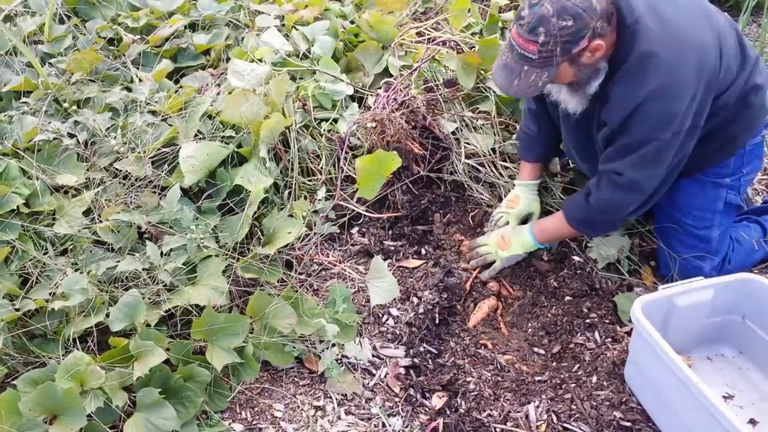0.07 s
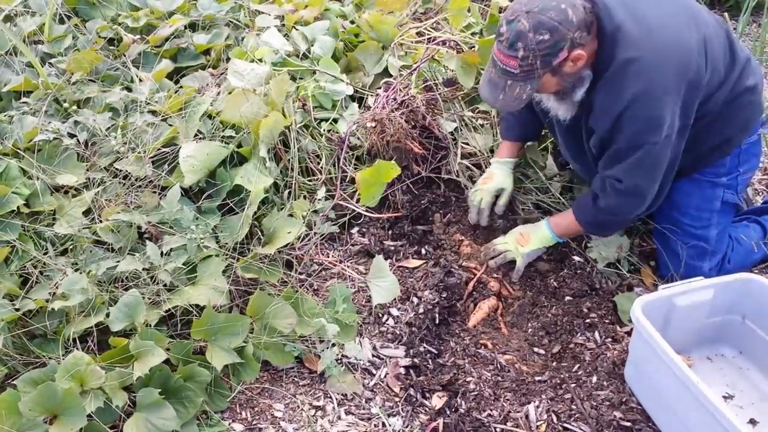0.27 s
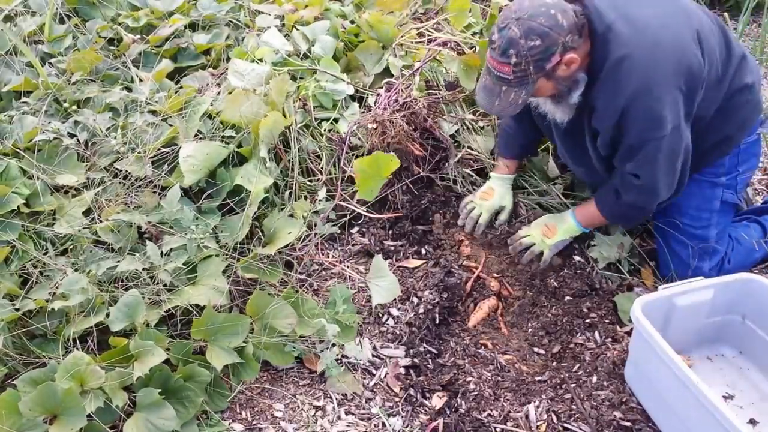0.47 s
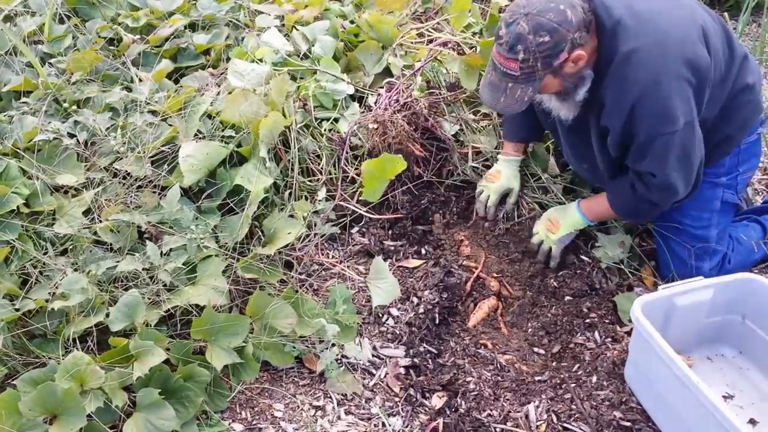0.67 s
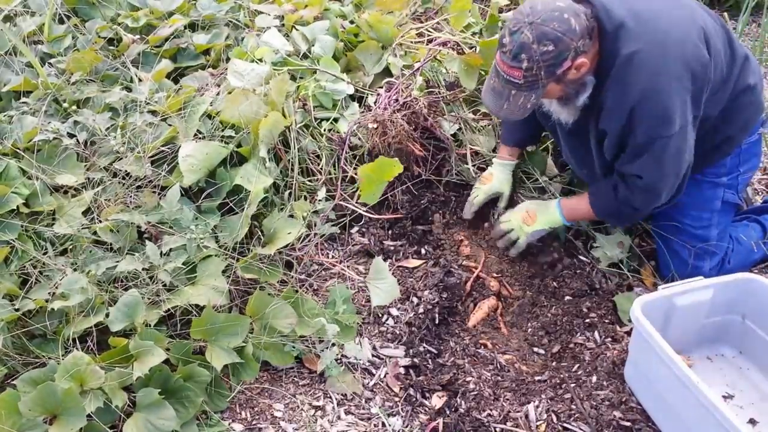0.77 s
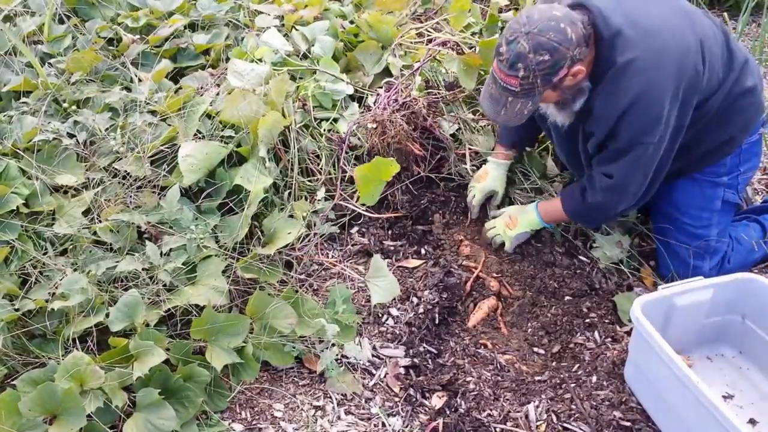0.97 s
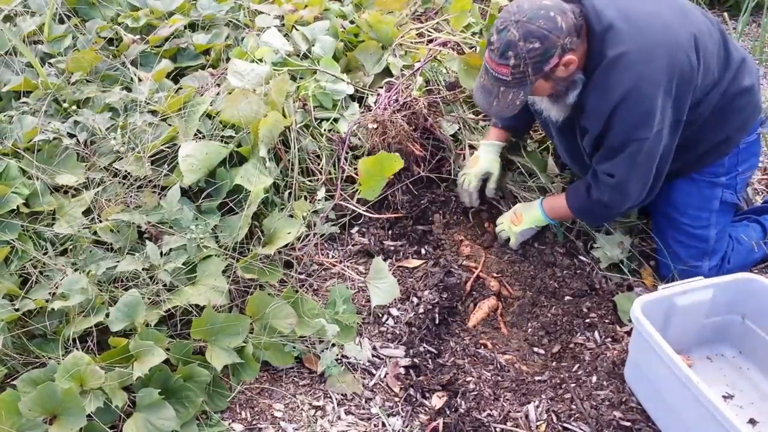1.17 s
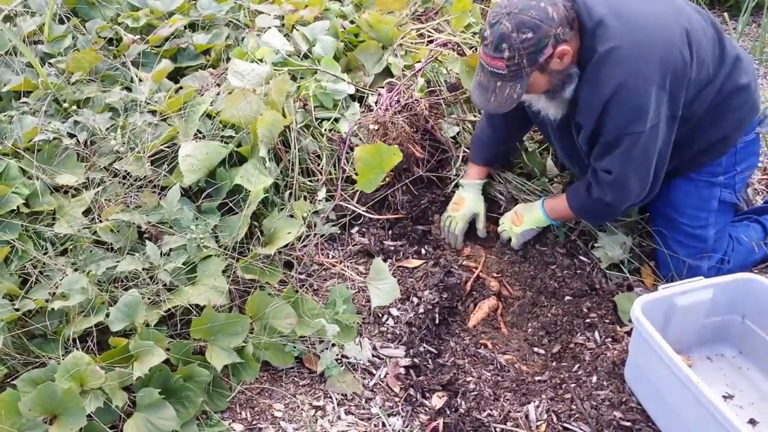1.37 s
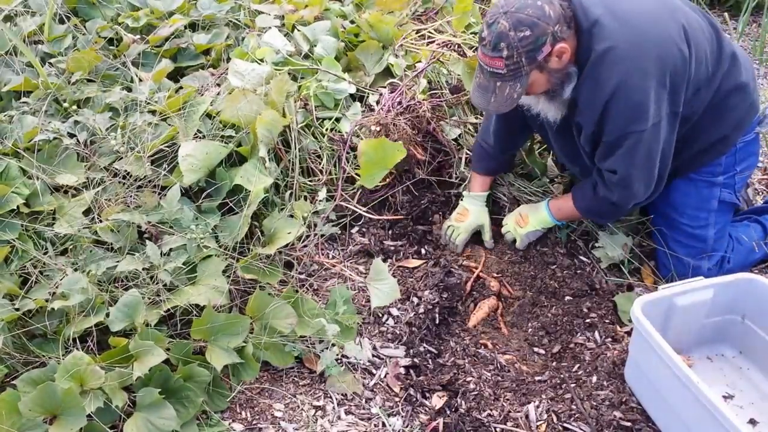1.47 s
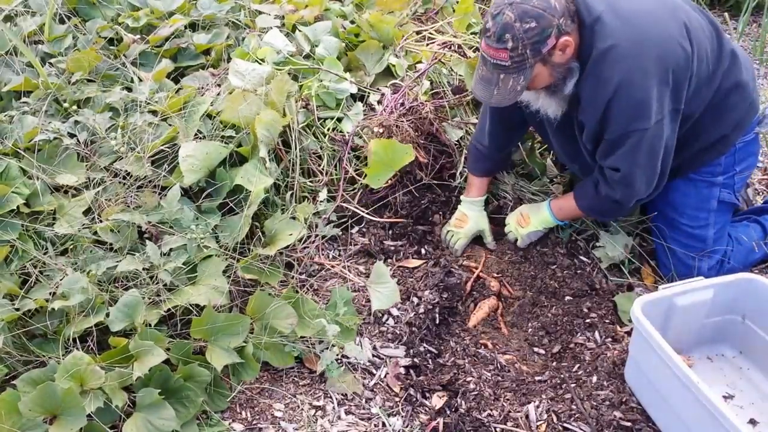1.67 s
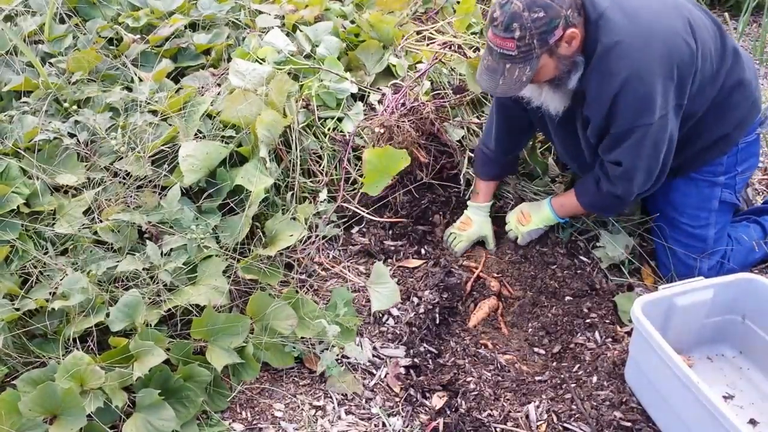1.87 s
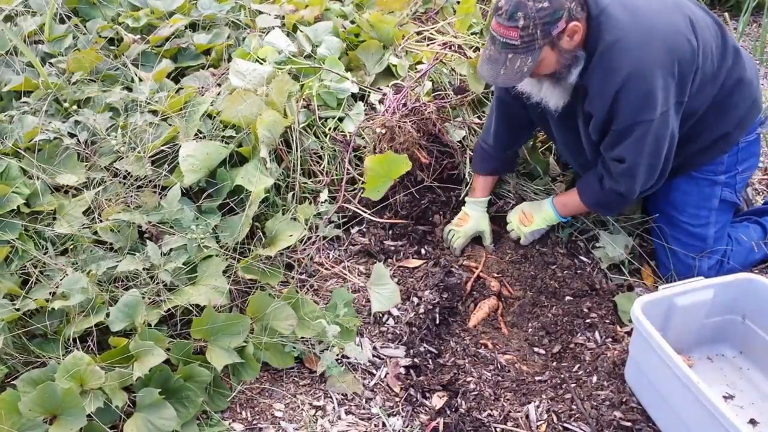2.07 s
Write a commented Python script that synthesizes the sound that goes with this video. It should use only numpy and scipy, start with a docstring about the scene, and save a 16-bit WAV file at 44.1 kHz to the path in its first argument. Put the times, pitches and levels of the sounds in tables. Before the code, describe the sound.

Digging in garden mulch, fine crackly rustles and ticks throughout, after an early hollow plastic knock and bounce. Low wind thumps strike the left side of the stereo microphone, leaves brush past, and open air hisses.

```python
"""From the start, leaves and open air hiss (noise) over a thin, far insect trill (a roughened tone) that fades.
Gloved hands comb wood-chip mulch throughout: tiny noise clicks, with a few chips snapping as filtered bursts.
At once a tuber drops into a plastic tub and bounces, as soft pushes that ring modes of the walls.
Wind buffets the microphone, mostly its left port, hardest at 0.4 s (with a sharp edge) and again at 1.4 s:
pulses over low noise. Vine leaves brush past the arm in the first second; then a hollow low rush swells."""
import sys
import numpy as np
from scipy import signal
from scipy.fft import rfft, irfft, next_fast_len
from scipy.io import wavfile

SR = 44100
rng = np.random.default_rng(int(sys.argv[2]) if len(sys.argv) > 2 else 0)


def transcribe(signal):
    """Save signal, clipped to [-1, 1], as a 16-bit WAV file at the path in sys.argv[1]."""
    frames = np.atleast_2d(signal).T
    limited = np.clip(frames, -1, 1)
    pcm = np.round(limited * 32767).astype(np.int16)
    wavfile.write(sys.argv[1], SR, pcm)


N = 93227
T = np.arange(N) / SR


def from_db(db):
    """Decibels to gain."""
    return 10 ** (np.asarray(db) / 20)


def rms_one(x):
    """Scale to an rms of 1."""
    return x / np.sqrt(np.mean(x ** 2) + 1e-20)


def in_time(rows):
    """Each column of a curve over time, at every sample."""
    s, *columns = np.transpose(rows)
    return [np.interp(T, s, c) for c in columns]


def at_hz(points, hz):
    """Read a spectrum on a log-frequency axis."""
    f, v = np.transpose(points)
    return np.interp(np.log(hz + 1), np.log(f), v)


def filtered(x, gain_at):
    """Apply a smooth gain over frequency."""
    size = next_fast_len(N + 4096)
    hz = np.arange(size // 2 + 1) * SR / size
    return irfft(rfft(x, size) * gain_at(hz), size)[..., :N]


def coloured(x, colour):
    """Give x a spectrum that falls away beyond its ends; rms 1."""
    low, high = colour[0][0], colour[-1][0]

    def gain_at(f):
        skirts = np.minimum(f / low, 1) ** 2 / np.maximum(f / high, 1) ** 8
        return from_db(at_hz(colour, f)) * skirts
    return rms_one(filtered(x, gain_at))


def pan(db):
    """Left and right gains that differ by db; positive leans left."""
    return from_db([[db / 2], [-db / 2]])


def drift(rate_hz):
    """Slow chance with spread 1: noise through two equal one-pole smoothers."""
    r = np.exp(-2 * np.pi * rate_hz / SR)
    noise = rng.standard_normal(2 * N)
    return rms_one(signal.lfilter([1], [1, -2 * r, r * r], noise)[N:])


# leaves and open air, tone: (frequency [Hz], relative level [dB])
AIR_COLOUR = [(100, 0), (350, 0), (560, -6), (820, 3), (1150, -1.5), (1900, -4), (2400, -4.5), (2950, -3.5),
              (3600, -6), (6500, -3), (10500, -13.5)]
# their loudness: (time [s], level [dB])
AIR_LEVEL = [(0, -49), (.5, -51.5), (.78, -52.5), (.95, -50.5), (1.4, -51), (1.8, -53), (2.1, -52.5)]
# how alike left and right are: (frequency [Hz], correlation [-1 to 1])
AIR_LIKENESS = [(100, 0.054), (500, .5), (1100, -0.26), (2400, 0.3), (5000, -0.22), (10000, -0.17)]


def garden():
    """Many small sources blur into a smooth hiss, its width set by the balance of mid and side noise."""
    def alike(f):
        return np.clip(at_hz(AIR_LIKENESS, f), -1, 1)
    mid = filtered(rng.standard_normal(N), lambda f: np.sqrt(1 + alike(f)))
    side = filtered(rng.standard_normal(N), lambda f: np.sqrt(1 - alike(f)))
    hiss = coloured(np.array([mid + side, mid - side]), AIR_COLOUR)
    return from_db(in_time(AIR_LEVEL)[0]) * hiss


# insect trill: (time [s], pitch [Hz], level before panning [dB])
TRILL = [(0, 4330, -57), (.2, 4400, -62), (.28, 4370, -54), (.38, 4480, -61), (.46, 4400, -56),
         (.52, 4346, -61), (.62, 4270, -51.5), (.72, 4270, -60), (.95, 4250, -63), (1.15, 4300, -76),
         (2.1, 4300, -89)]
TRILL_WIDTH_HZ, TRILL_PAN_DB = 140, -1.5


def insect():
    """A gliding tone, roughened by random changes of strength and phase, that fades away."""
    hz, db = in_time(TRILL)
    carrier = np.exp(2j * np.pi * np.cumsum(hz) / SR)
    sides = []
    for _ in range(2):
        flutter = drift(TRILL_WIDTH_HZ) + 1j * drift(TRILL_WIDTH_HZ)
        sides.append(np.real(carrier * flutter))
    return pan(TRILL_PAN_DB) * from_db(db) * np.array(sides)


# turbulence, tone: (frequency [Hz], relative level [dB])
WIND_COLOUR = [(20, -19.5), (40, -5.5), (75, 4), (120, -0.5), (200, -11.5), (300, -22), (450, -37.5),
               (800, -64.5)]
EDDY_LEAN = 0.083   # the pressure rebounds more after the dip than before it


def port_wind(eddies, turbulence):
    """Low turbulence noise, and for each eddy a dip of pressure between two swells."""
    out = from_db(in_time(turbulence)[0]) * coloured(rng.standard_normal(N), WIND_COLOUR)
    for s, db, hz in eddies:
        u = np.clip((T - s) * np.sqrt(2) * np.pi * hz, -10, 10)
        out += from_db(db) * (u * u - 1 + EDDY_LEAN * u) * np.exp(-u * u / 2)
    return out


# eddies that hit each port: (time [s], depth of the dip [dB], pitch [Hz])
EDDIES_LEFT = [(.128, -20, 67), (.162, -21.5, 75), (.2865, -17.5, 298), (.297, -14, 101), (.358, -13.5, 96),
               (.390, -15, 72), (.3975, -18.5, 188), (.4027, -15, 315), (.407, -4, 126), (.444, -12, 107),
               (.515, -18, 105), (.624, -23.5, 148), (.654, -30, 157), (.903, -21.5, 146),
               (.929, -17.5, 135), (.961, -18.5, 132), (1.242, -18.5, 90.5), (1.326, -16, 136),
               (1.380, -24, 202), (1.399, -8, 100), (1.492, -11.5, 113.4), (1.531, -15.5, 105),
               (1.644, -14.5, 200), (1.650, -9.5, 89), (1.669, -16.5, 124), (1.763, -20, 70.5),
               (1.820, -27, 77.6), (1.947, -23, 86), (2.055, -27, 99), (2.108, -25, 133)]
EDDIES_RIGHT = [(1.027, -43, 110), (1.075, -32, 131), (1.567, -30, 130), (1.643, -35, 59.3),
                (1.924, -19.5, 86), (2.036, -28, 97)]
# turbulence at each port: (time [s], level [dB])
WIND_LEFT = [(0, -41), (.12, -31.5), (.22, -35), (.31, -26), (.42, -27.5), (.56, -39), (.8, -42.5),
             (.95, -31), (1.17, -47.5), (1.36, -30.5), (1.45, -41.5), (1.6, -30.5), (1.72, -42.5),
             (1.86, -37), (2.1, -43)]
WIND_RIGHT = [(0, -47), (.15, -40), (.4, -49), (.7, -41), (.9, -49), (1.06, -36.5), (1.2, -54),
              (1.45, -51.5), (1.6, -46), (1.72, -50.5), (1.84, -39.5), (2.1, -55)]
# hollow low rush as the gust passes: (time [s], level [dB])
RUSH_LEVEL = [(0, -69), (.95, -63), (1.08, -49), (1.16, -44.5), (1.27, -57), (1.39, -47), (1.55, -53),
              (1.75, -61), (2.1, -63.5)]
# its tone: (frequency [Hz], relative level [dB])
RUSH_COLOUR = [(100, -19), (230, -3), (320, 3.5), (410, -5.5), (540, -25), (1000, -41)]


def wind():
    """Each port takes its own buffets; the low rush reaches both, partly alike."""
    shared = rng.standard_normal(N)
    rush = coloured(rng.standard_normal((2, N)) + shared, RUSH_COLOUR)
    left = port_wind(EDDIES_LEFT, WIND_LEFT)
    right = port_wind(EDDIES_RIGHT, WIND_RIGHT)
    return np.array([left, right]) + from_db(in_time(RUSH_LEVEL)[0]) * rush


# vine leaves brushing past the arm: (time [s], level [dB])
BRUSH_LEVEL = [(0, -63.5), (.3, -56.5), (.5, -54.5), (.65, -55.5), (.8, -51), (.9, -57.5), (1.1, -72.5),
               (2.1, -80)]
# their tone: (frequency [Hz], relative level [dB])
BRUSH_COLOUR = [(1200, -23.5), (1650, -6), (1930, -1), (2250, -9), (2950, -1), (3700, -7), (5000, -2.5)]


def vines():
    """Leaves slide softly along the arm: friction as coloured noise that swells and fades."""
    return from_db(in_time(BRUSH_LEVEL)[0]) * coloured(rng.standard_normal((2, N)), BRUSH_COLOUR)


# the tuber's contacts with the tub: (time [s], strength of the push [dB], contact hardness [Hz])
KNOCKS = [(0.066, -24.5, 1520), (0.0694, -19, 1060), (0.0781, -32.5, 600), (0.167, -32.5, 330),
          (.181, -43, 400), (0.2572, -30, 550)]
# ringing modes of the tub: (frequency [Hz], relative level [dB], decay by 60 dB [s])
TUB_MODES = [(220, -3, 0.042), (270, -8, 0.1), (368.4, -12, .12), (482, -2.5, 0.048), (590, -1.5, 0.036),
             (730, -28, .025), (860, -19, 0.011), (1180, -12.5, 0.058), (1347, -11, .06), (1510, -4, 0.051),
             (1685, -27, 0.24)]
# tone of the thud: (frequency [Hz], relative level [dB])
THUD_COLOUR = [(170, -3), (300, 6), (580, 17), (800, -10), (1000, -32), (1350, -8), (1700, -3)]
THUD_DB, THUD_DECAY_S = -8, 0.0045
TUB_LAG_S, TUB_PAN_DB, TUB_TOP_HZ = 0.00021, 1.5, 1500


def tub():
    """Each soft contact gives a short thud and sets the plastic walls ringing."""
    force = np.zeros(N)
    for s, db, hz in KNOCKS:
        age = np.maximum(T - s, 0)
        u = np.minimum(age * 2 * np.pi * hz, 40)
        push = u * np.exp(-u)
        force += from_db(db) * push / push.sum()
    thud = coloured(rng.standard_normal(N), THUD_COLOUR) * np.exp(-T / THUD_DECAY_S)
    out = from_db(THUD_DB) * signal.fftconvolve(force, thud)[:N]
    for hz, db, t60 in TUB_MODES:
        r = from_db(-60 / (t60 * SR))
        w = 2 * np.pi * hz / SR
        ring = signal.lfilter([1, -r * np.cos(w)], [1, -2 * r * np.cos(w), r * r], force + 1e-18)
        out += from_db(db) * ring
    out = signal.sosfilt(signal.butter(2, TUB_TOP_HZ, fs=SR, output="sos"), out)
    later = np.interp(T - TUB_LAG_S, T, out)   # reaches the right port last
    return pan(TUB_PAN_DB) * np.array([out, later])


# short filtered bursts: chips and twigs that snap, flick or tap,
# and at 0.4 s (890 Hz) the sharp edge of a wind buffet:
# (time [s], level before the envelope [dB], pitch [Hz], decay [s], bandwidth [share of the pitch])
BURSTS = [(0.122, -45, 1180, 0.0023, .5), (.166, -35, 390, 0.0064, 0.47), (.168, -45, 1290, 0.0035, 0.27),
          (.280, -38, 6700, 0.0045, 0.23), (0.397, -40.5, 6500, 0.0037, 0.75), (.4, -40, 890, 0.0038, 0.28),
          (0.55, -40, 7500, 0.0033, 0.82), (0.597, -40, 7000, .004, 0.8), (0.636, -40.5, 7000, 0.0047, .35),
          (0.669, -40, 6500, 0.0032, 0.55), (0.736, -41, 7500, 0.0051, .5),
          (0.901, -39.5, 8000, 0.0018, 0.69), (0.949, -46, 8000, 0.0016, 0.43),
          (1.121, -42, 6660, 0.004, 0.33), (1.24, -41, 6500, 0.005, .5), (1.345, -50, 9200, 0.044, 0.23),
          (1.79, -41.5, 1220, 0.0022, .35), (1.8463, -34, 6140, 0.0033, 0.21),
          (1.847, -32.5, 7400, 0.0016, 0.56), (1.86, -42.5, 7800, 0.0071, .6)]
CRACK_DB, BURST_ATTACK_S = -4, 0.001   # crack peak relative to the level above


def snaps_and_buffet_edge():
    """A chip giving way, or a buffet's edge: one crack and a short noise burst around its own pitch."""
    out = np.zeros((2, N))
    for s, db, hz, length, width in BURSTS:
        band = [hz / (1 + width / 2), min(hz * (1 + width / 2), SR / 2 - 1)]
        body = signal.butter(2, band, "band", fs=SR, output="sos")
        crack = signal.sosfilt(body, signal.unit_impulse(N, int(s * SR)) + 1e-18)
        crack = from_db(CRACK_DB) * crack / np.abs(crack).max()
        burst = rms_one(signal.sosfilt(body, rng.standard_normal((2, N))))
        age = np.maximum(T - s, 0)
        envelope = (1 - np.exp(-age / BURST_ATTACK_S)) * np.exp(-age / length)
        out += from_db(db) * (crack + burst * envelope)
    return out


# effort of the hands: (time [s], rustle level before clumping and panning [dB])
DIGGING = [(0.0, -56), (0.15, -59.5), (0.32, -49.5), (0.33, -54.5), (0.79, -49.5), (0.82, -53), (0.99, -63),
           (1.1, -53), (1.34, -53), (1.75, -57), (1.8, -52.5), (1.83, -59), (1.85, -53), (1.86, -54),
           (1.87, -49.5), (1.89, -67), (2.09, -65), (2.11, -53)]
# tone of the rustle: (frequency [Hz], relative level [dB])
RUSTLE_COLOUR = [(600, 5), (1500, -16), (3000, -16.5), (4000, -5), (5200, -7.5), (6700, 0), (8200, -3),
                 (10500, -10)]
RUSTLE_PAN_DB = 1.8
CRUMBS_PER_S, CRUMB_SPREAD_DB, CRUMB_CLUMP_DB = 7000, 3.5, 1.8


def mulch():
    """Crumbs and chips rub in dense clumps of tiny clicks that follow the effort of the hands."""
    size_db = CRUMB_SPREAD_DB * np.minimum(rng.exponential(1, (2, N)), 5)
    sizes = from_db(size_db) * rng.choice([-1, 1], (2, N))
    clicks = sizes * (rng.random((2, N)) < CRUMBS_PER_S / SR)
    level_db = in_time(DIGGING)[0] + CRUMB_CLUMP_DB * drift(50)   # clumping drifts at 50 Hz
    return pan(RUSTLE_PAN_DB) * from_db(level_db) * coloured(clicks, RUSTLE_COLOUR)


def scene():
    """Open air, insect, wind, vines, tub, short bursts and digging together."""
    return garden() + insect() + wind() + vines() + tub() + snaps_and_buffet_edge() + mulch()


# tilt between the ports: (frequency [Hz], left port's gain and right port's loss [dB])
PORT_TILT = [(100, 0.5), (1200, -0.5), (3200, .5), (4400, 1), (5800, 3), (7500, 0.5), (10500, -2)]
CUTOFF_HZ = 10650


def record(dry):
    """The two ports differ in tone, most in the treble; the top is cut steeply."""
    def gain_at(f):
        tilt = from_db(at_hz(PORT_TILT, f) * np.array([[1], [-1]]))
        return tilt / np.sqrt(1 + (f / CUTOFF_HZ) ** 300)
    return filtered(dry, gain_at)


dry = scene()
out = record(dry)
transcribe(out)
```